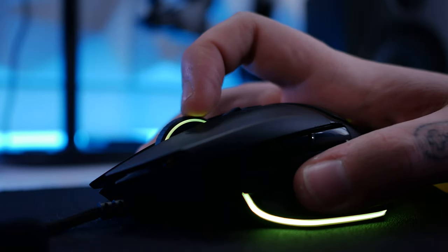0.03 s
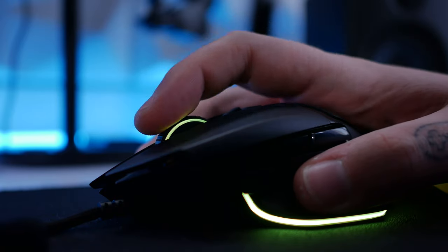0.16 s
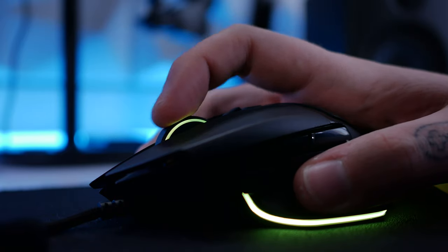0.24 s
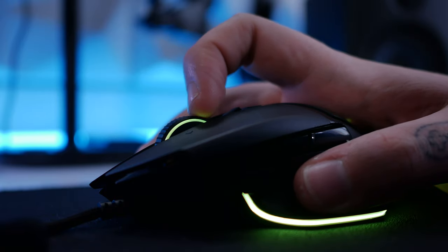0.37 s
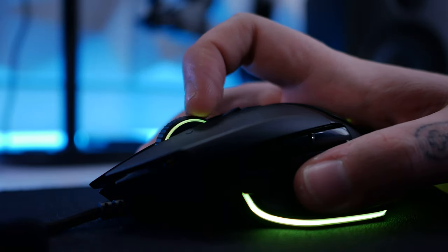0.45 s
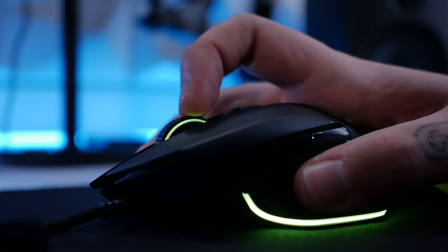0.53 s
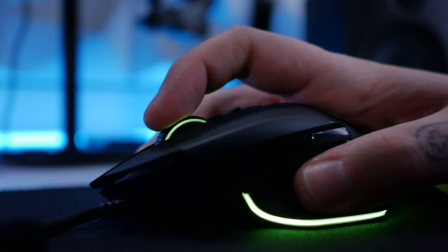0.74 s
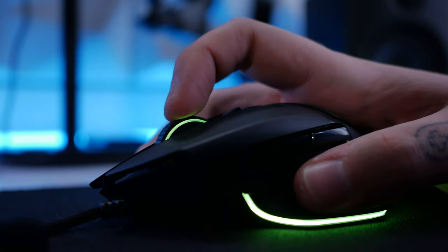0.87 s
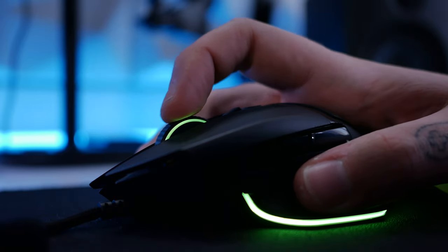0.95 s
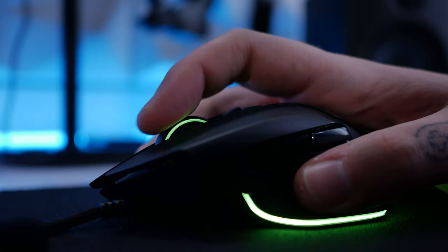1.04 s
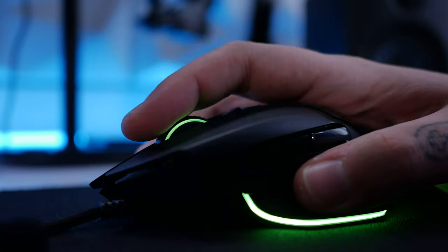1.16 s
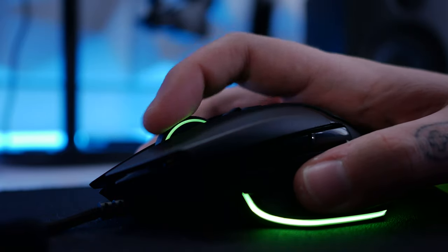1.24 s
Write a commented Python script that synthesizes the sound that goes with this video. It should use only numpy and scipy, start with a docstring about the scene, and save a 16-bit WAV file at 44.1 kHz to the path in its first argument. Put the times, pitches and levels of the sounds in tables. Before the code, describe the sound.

Close up, a finger rolls a mouse wheel: a few muted ticks, a brief gap, faster ticks, then a loud crisp plastic snap and faint after-click, over steady fan air and thin electrical whine.

```python
"""A finger rolls the scroll wheel of a plastic computer mouse, heard close up.
The detent spring ticks over the notches, knocks the shell and thumps the desk; the wheel scrapes, snaps and
rattles back. Each contact is a noise burst ringing decaying modes, or coloured by a spectrum.
A small room answers with a grainy noise tail, over filtered-noise fan air and hum and a faint sine whine.
The sound is nearly mono."""
import sys
import numpy as np
from scipy import signal
from scipy.fft import rfft, irfft
from scipy.io import wavfile
from scipy.ndimage import uniform_filter1d

SR = 44100
rng = np.random.default_rng(int(sys.argv[2]) if len(sys.argv) > 2 else 0)


def unload_audio(sound):
    """Save the sound as a 16-bit wav file, at the path given as the first command line argument."""
    columns = np.transpose(np.atleast_2d(sound))
    # keep every value between -1 and 1, then stretch to whole-number steps
    steps = np.round(np.clip(columns, -1, 1) * 32767)
    wavfile.write(sys.argv[1], SR, steps.astype(np.int16))


N = 57330


def undb(db):
    """Decibels to gain."""
    return 10 ** (np.asarray(db) / 20)


def level(x, db):
    """Set the rms level of a steady sound."""
    return x * undb(db) / np.sqrt(np.mean(x ** 2))


def blow(x, db, length_s=0.002):
    """Give a short sound the energy of `length_s` seconds at this rms level."""
    return x * undb(db) * np.sqrt(length_s * SR / np.sum(x ** 2))


def since(start_s):
    """Seconds since a moment, zero before it."""
    return np.maximum(np.arange(N) / SR - start_s, 0)


def decay(t, t60_s):
    """Exponential decay that falls 60 dB in t60_s."""
    return np.exp(-np.log(1000) * t / t60_s)


def through(x, response):
    """Pass a sound through an impulse response."""
    return signal.fftconvolve(x, response)[:N]


def colour(x, points, tilt_db=0):
    """Minimum-phase filter with a (Hz, dB) spectrum, tilted in dB per octave about 8 kHz."""
    hz, db = np.array(points, float).T
    octave = np.log2(np.maximum(np.fft.rfftfreq(4096, 1 / SR), 10))
    curve_db = np.interp(octave, np.log2(hz), db)
    # the tilt stops growing three octaves below 8 kHz
    curve_db = curve_db + tilt_db * np.maximum(octave - np.log2(8000), -3)
    # folding the cepstrum forward in time makes the filter causal
    cepstrum = irfft(np.log(undb(curve_db)))
    half = len(cepstrum) // 2
    cepstrum[1:half] *= 2
    cepstrum[half + 1:] = 0
    return through(x, irfft(np.exp(rfft(cepstrum))))


def tilt(x, tilt_db):
    """Tilt an otherwise flat spectrum about 8 kHz, in dB per octave."""
    return colour(x, [(1, 0)], tilt_db)


def grit(grain_hz, rough_db):
    """A gain that wanders at random, grain by grain."""
    grains = rng.standard_normal(N)
    return undb(rough_db * np.interp(since(0) * grain_hz, np.arange(N), grains))


def contact(start_s, hold_s, rise_s, fall_s, size=2048, count=2):
    """A noise burst (rise, hold, exponential fall) that excites all frequencies almost evenly."""
    t = np.arange(size) / SR
    shape = (1 - np.exp(-t / rise_s)) * np.exp(-np.maximum(t - hold_s, 0) / fall_s)
    burst = shape * rng.standard_normal(size)
    # alternately flatten the spectrum and restore the envelope
    for _ in range(count):
        white = irfft(np.exp(1j * np.angle(rfft(burst))))
        envelope = np.sqrt(uniform_filter1d(white ** 2, size=32) + 1e-12)
        burst = shape * white / envelope
    return np.pad(burst, (max(int(start_s * SR), 0), N))[:N]


def ring(modes, size=4096):
    """Impulse response of decaying modes; each call lands on a slightly different spot."""
    detune, spread_db = 0.004, 1.8  # random spread of tuning (share of pitch) and of mode level
    t = np.arange(size) / SR
    response = 0
    for hz, db, t60_s in modes:
        strength, tuning = rng.standard_normal(2)
        tone = np.sin(2 * np.pi * hz * (1 + detune * tuning) * t)
        response = response + undb(db + spread_db * strength) * decay(t, t60_s) * tone
    return response


# spectrum of the fan air: pitch_hz, relative level_db [dB per Hz]
AIR_COLOUR = [(15, -72), (25, -4.5), (64, -6.5), (86, -6.5), (209, -5.5), (331, -9), (2060, -25),
              (3530, -29), (15500, -32)]
# hum of fans and case: pitch_hz, width_hz (full width at half amplitude), level_db (rms)
HUM_BANDS = [(62.3, 7, -64), (117.1, 12, -64), (211.3, 26, -55), (291.6, 12.6, -59)]
# electrical whine: pitch_hz, level_db (rms)
WHINE_TONES = [(2000, -68.5), (2267, -77), (2400, -73.5), (3733, -78.5), (3867, -74.5), (4000, -77),
               (4267, -65), (4400, -76.5), (4533, -74.5), (6267, -79), (12800, -75)]


def computer():
    """Broadband fan air, narrow noise bands that waver as hum, and steady sines as whine."""
    air = level(colour(rng.standard_normal(N), AIR_COLOUR), -52.5)
    hz = np.fft.rfftfreq(N, 1 / SR)
    hum = 0
    for pitch_hz, width_hz, level_db in HUM_BANDS:
        band = 1 / (1 + ((hz - pitch_hz) / width_hz * 2) ** 4)
        hum = hum + level(irfft(rfft(rng.standard_normal(N)) * band, N), level_db)
    whine = 0
    for pitch_hz, level_db in WHINE_TONES:
        cycles = pitch_hz * since(0) + rng.random()  # random starting phase
        whine = whine + level(np.sin(2 * np.pi * cycles), level_db)
    return air + hum + whine


# spectrum of the room echo: pitch_hz, relative level_db [dB per Hz]
ECHO_COLOUR = [(200, 14.5), (1500, 0.5), (3000, 0.5), (6000, 0), (9000, -4), (12500, -7), (16000, -11)]


def room(x):
    """Grainy echo of a small furnished room: delayed, decaying noise used as an impulse response."""
    room_db, t60_s, delay_s = -22.5, 0.49, 0.0145
    t = since(delay_s)
    echoes = rng.standard_normal(N) * grit(grain_hz=550, rough_db=4)
    tail = colour(echoes * (t > 0) * decay(t, t60_s), ECHO_COLOUR)
    unit_tail = tail / np.sqrt(np.sum(tail ** 2))
    return undb(room_db) * through(x, unit_tail)


# the finger dragging the wheel round: middle_s, half_length_s, level_db (rumble at the peak of the swell)
DRAGS = [(0.003, 0.039, -41.5), (0.166, 0.038, -45)]
# spectrum of the rolling rumble: pitch_hz, relative level_db [dB per Hz]
RUMBLE_COLOUR = [(30, -15), (70, -5.5), (160, 2.5), (400, -24.5), (750, -1.5), (1600, -16.5), (15000, -52)]
# modes of the detent spring: pitch_hz, relative level_db, t60_s
SPRING_MODES = [(2800, 0.5, 0.01), (4200, -0.5, 0.013), (4940, 10, 0.0036), (6100, 2, 0.0042),
                (6700, 1, 0.0088), (10900, -1, 0.004), (12550, -5, 0.0045), (14000, -5, .005)]


def rolling():
    """Low rumble and a faint spring rattle, both noise, that swell while the wheel turns."""
    motion = 0
    for middle_s, half_length_s, level_db in DRAGS:
        swell = np.exp(-((since(0) - middle_s) / half_length_s) ** 4)
        motion = motion + undb(level_db) * swell
    rumble = level(colour(rng.standard_normal(N), RUMBLE_COLOUR), 0)
    uneven = rng.standard_normal(N) * grit(grain_hz=1800, rough_db=8)
    rattle = level(through(uneven, ring(SPRING_MODES)), -11)  # relative to the rumble
    return motion * (rumble + rattle)


# the wheel rubbing in its cradle: start_s, length_s, level_db (over that length), tilt_db [dB per octave]
RUBS = [(.2022, .004, -29, -.5), (.2062, .0032, -23.5, 0), (.2115, .006, -28.5, -.5), (.3048, .004, -49, 0),
        (.309, .005, -42.5, 0), (.314, .014, -55, -.5)]
# spectrum of the rubbing: pitch_hz, relative level_db [dB per Hz]
RUB_COLOUR = [(30, 8), (130, 8), (600, -9.5), (1500, 8), (4000, 11), (7500, 7.5), (9300, 9), (12500, 4),
              (16000, -34)]
# modes of the wheel and its cradle: pitch_hz, relative level_db, t60_s
WHEEL_MODES = [(1440, -12, .022), (2360, -8, .011), (2750, -8, .011), (3410, -7, .018), (4040, -1, .009),
               (4770, -5.5, .011), (5440, 1.5, .015), (6100, -4.5, .014), (6610, -4.5, .012),
               (8400, -1, .007), (10150, 2.5, .007), (11510, 3, .01), (12490, 7, .011), (12960, 4.5, .01)]
# modes of the hollow shell: pitch_hz, relative level_db, t60_s
SHELL_MODES = [(677, -12, 0.12), (808, -10, 0.062), (1150, -26, 0.005), (1380, -1.5, 0.021),
               (1467, 7, 0.017), (1617, 5.5, .017), (1800, -3, 0.015), (2250, -4, .014), (2500, -10, .012),
               (2940, -10, 0.025)]


def scrapes():
    """Gritty rubbing that rings the wheel and stirs the shell."""
    out = 0
    for start_s, length_s, level_db, tilt_db in RUBS:
        push = contact(start_s, length_s, rise_s=0.0012, fall_s=0.00079)
        rub = push * grit(grain_hz=1800, rough_db=3.5)
        # ring levels are relative to the rubbing
        sound = blow(colour(rub, RUB_COLOUR), 0)
        sound = sound + blow(through(rub, ring(WHEEL_MODES)), -23)
        sound = sound + blow(through(rub, ring(SHELL_MODES)), -16)
        out = out + blow(tilt(sound, tilt_db), level_db, length_s)
    return out


# hard contacts of the wheel in its cradle: start_s, level_db (over 2 ms), hold_s, tilt_db [dB per octave]
STRIKES = [(0.2012, -28.5, 0.00056, 0), (0.2064, -33.5, 0.0012, -3), (0.2095, -9, 0.00117, 1),
           (0.2157, -22.5, 0.00011, 1), (0.3008, -41, .0012, -5), (.3090, -38.5, 0.00017, -2.5),
           (0.3115, -39.5, 0.00059, -4)]
# spectrum of the wheel's crack: pitch_hz, relative level_db [dB per Hz]
CRACK_COLOUR = [(40, -56), (200, -53), (600, -7), (1500, -3), (5000, 4), (7500, 3), (9200, -4),
                (10300, 5.5), (12500, 5.5), (13700, 0), (14800, -5), (16000, -30)]


def snaps():
    """Plastic strikes plastic: a bright crack and a short ring of the wheel."""
    out = 0
    for start_s, level_db, hold_s, tilt_db in STRIKES:
        push = contact(start_s, hold_s, rise_s=0.000067, fall_s=0.00043)
        # these two levels set the balance only
        crack = blow(colour(push, CRACK_COLOUR), 3.5)
        wheel = blow(through(push, ring(WHEEL_MODES)), 2)
        out = out + blow(tilt(crack + wheel, tilt_db), level_db)
    return out


# notches of the wheel, levels over 2 ms: start_s, tick_db (spring), tilt_db [dB per octave],
# knock_db (shell), push_s (hold of the push on the shell), thump_db (desk), thump_hz
DETENTS = [(.0033, -35, 2, -30.5, 0.001, -33, 202), (0.0271, -34.5, -2, -32, 0.00052, -34.5, 185),
           (0.0717, -42, -9, -37, 0.0079, -34, 195), (.1420, -33, 3.5, -30, 0.002, -54, 147),
           (0.1559, -33.5, 5, -31, .0035, -39.5, 135), (.1701, -34.5, 6, -31.5, 0.00258, -38.5, 123),
           (0.1884, -30.5, 2, -37.5, 0.0007, -34.5, 110), (0.2024, -30, 4, -30.5, .002, -52, 110),
           (.2170, -29.5, 4.5, -29, 0.0032, -50.5, 192)]
# spectrum of the spring's crack: pitch_hz, relative level_db [dB per Hz]
SPRING_COLOUR = [(300, -9), (1500, 6.5), (4700, -2), (8800, -3.5), (15500, -14.5)]


def notches():
    """The spring ticks and rings into each notch, the shell knocks just after, the mouse thumps the desk."""
    knock_lag_s = 0.000825
    thump_rise_s, thump_t60_s = 0.003, 0.018
    out = 0
    for start_s, tick_db, tilt_db, knock_db, push_s, thump_db, thump_hz in DETENTS:
        push = contact(start_s, hold_s=0.00085, rise_s=0.000067, fall_s=0.0013)
        flick = push * grit(grain_hz=1800, rough_db=4)
        # these two levels set the balance only
        spring = blow(through(flick, ring(SPRING_MODES)), 0)
        crack = blow(colour(flick, SPRING_COLOUR), 0.5)

        shell_push = contact(start_s + knock_lag_s, push_s, rise_s=0.00005, fall_s=0.00126)
        knock = through(shell_push, ring(SHELL_MODES))

        t = since(start_s)
        swell = (1 - np.exp(-t / thump_rise_s)) * decay(t, thump_t60_s)
        thump = np.sin(2 * np.pi * thump_hz * t) * swell

        out = out + blow(tilt(spring + crack, tilt_db), tick_db)
        out = out + blow(tilt(knock, tilt_db), knock_db)
        out = out + blow(thump, thump_db)
    return out


def widen(x):
    """The same sound in both channels, apart from a trace of hiss in opposite polarity."""
    side = level(rng.standard_normal(N), -70.5)
    return np.array([x + side, x - side])


def scene():
    """The mouse and its echo over the computer."""
    mouse = notches() + rolling() + snaps() + scrapes()
    return widen(mouse + room(mouse) + computer())


def record(dry):
    """The recorder clips at full scale and cuts the top steeply."""
    top_hz = 15900
    low_pass = signal.ellip(10, 0.2, 70, top_hz, fs=SR, output="sos")  # 0.2 dB ripple, 70 dB stop
    return signal.sosfilt(low_pass, np.clip(dry, -1, 1))


dry = scene()
out = record(dry)
unload_audio(out)
```